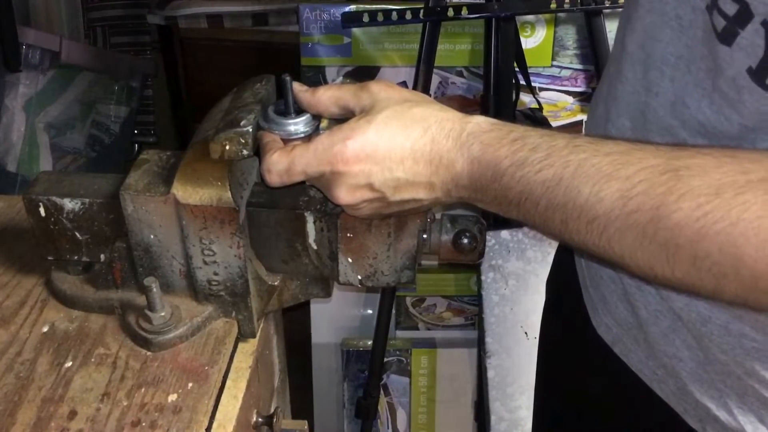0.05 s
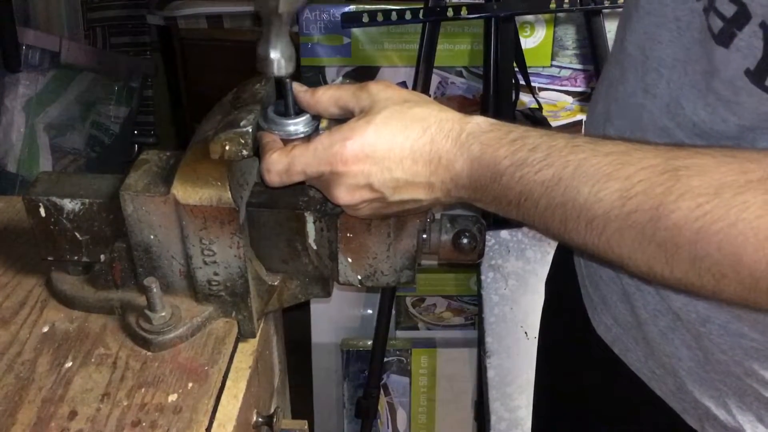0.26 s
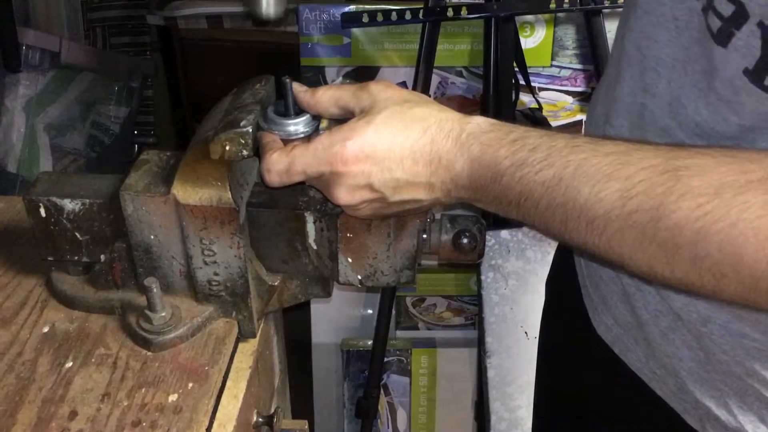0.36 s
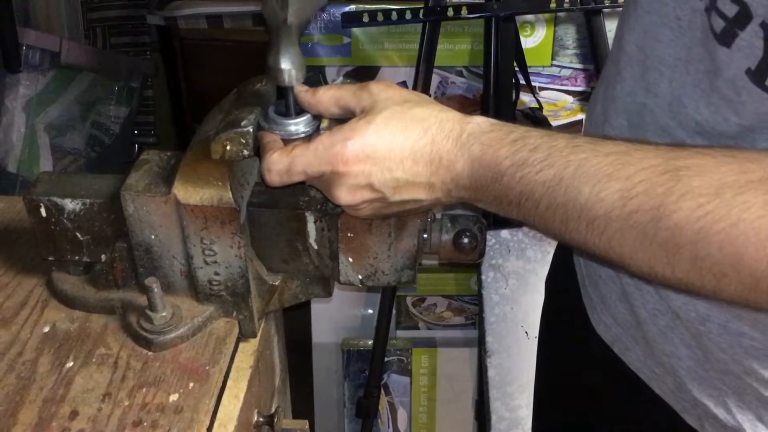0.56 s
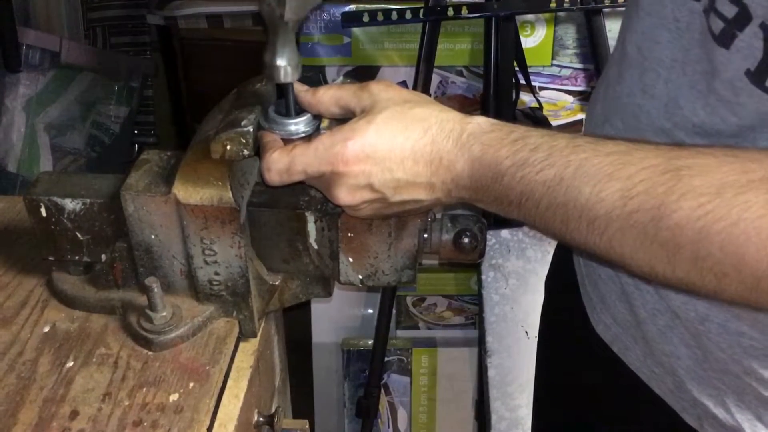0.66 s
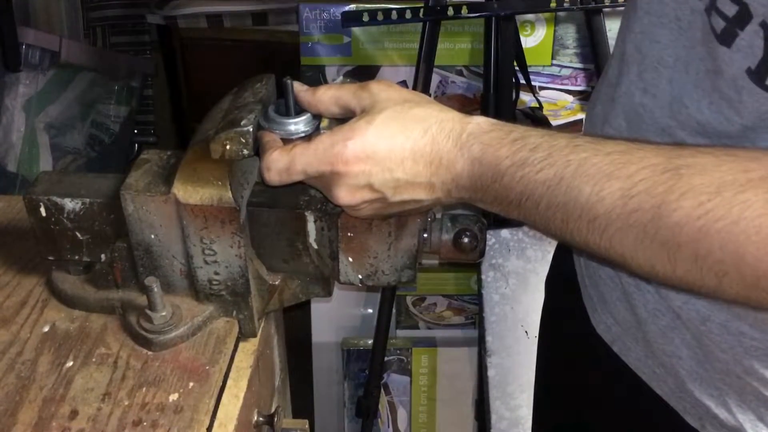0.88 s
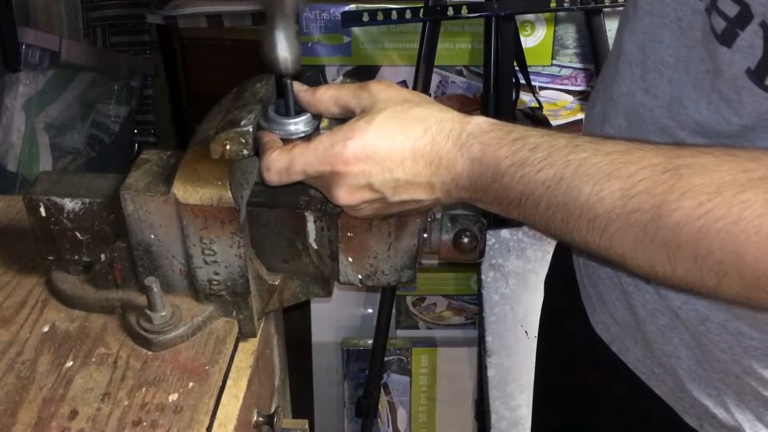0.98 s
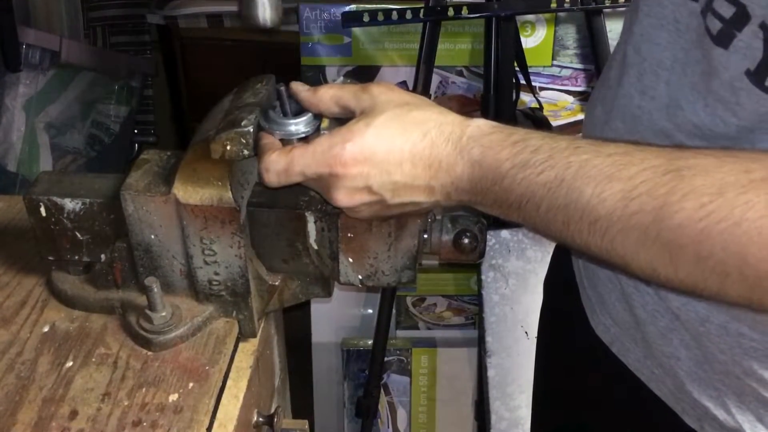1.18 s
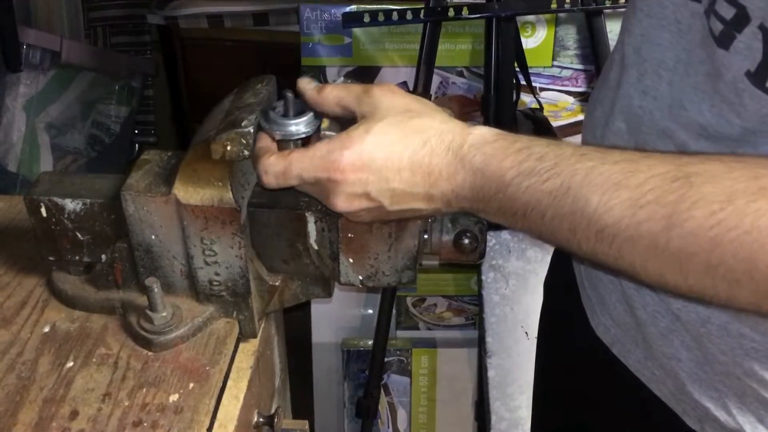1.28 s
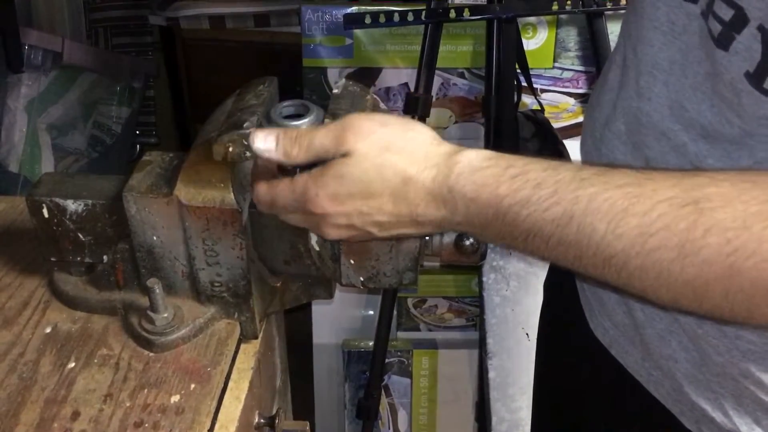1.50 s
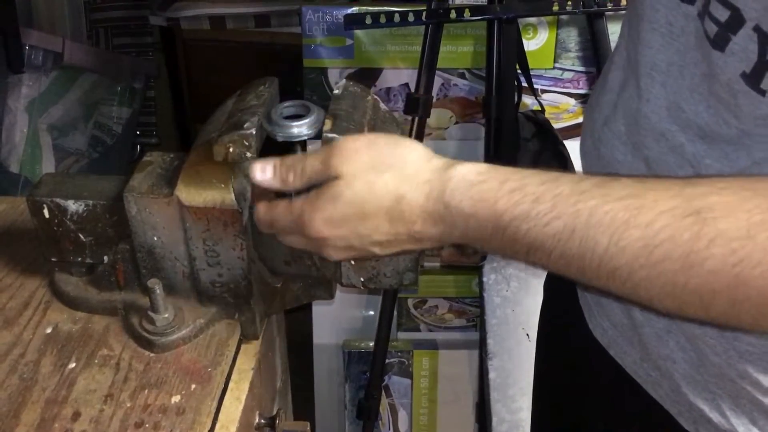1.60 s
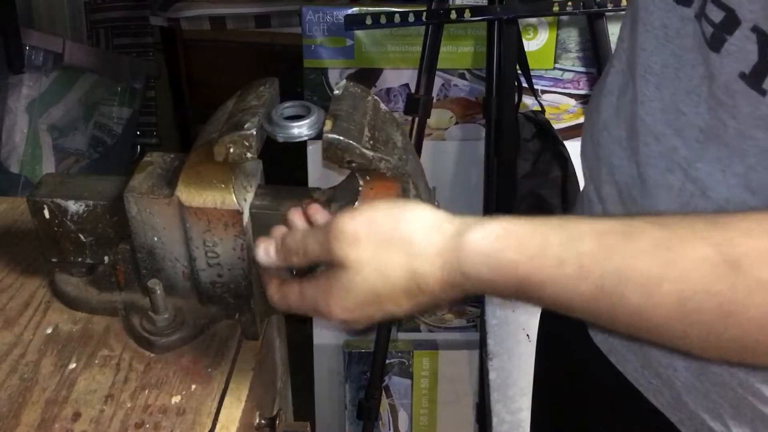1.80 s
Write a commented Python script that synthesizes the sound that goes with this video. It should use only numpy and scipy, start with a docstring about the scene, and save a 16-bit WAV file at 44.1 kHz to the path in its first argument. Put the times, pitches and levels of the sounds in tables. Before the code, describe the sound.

A hammer strikes a steel punch three times at an even pace, each bright blow ringing briefly. The last rattles the punch loose, then the metal clinks and scrapes with a high ring, close by in a small, quiet workshop.

```python
"""Hammer and punch at a bench vice

A hammer taps a steel punch in a fitting that rests on a vice, in a small, quiet workshop.
After the tail of an earlier blow, three even blows ring the steel and shake the bench; the last
frees the punch, which rattles. Then the loosened metal is drawn off: it knocks, clinks, scrapes
and sings on one high note."""
import sys
import numpy as np
from scipy import signal
from scipy.fft import rfft, irfft
from scipy.io import wavfile
from scipy.ndimage import uniform_filter1d

SR = 44100
rng = np.random.default_rng(int(sys.argv[2]) if len(sys.argv) > 2 else 0)


def store_pcm(level_fs):
    """Save levels as 16-bit WAV."""
    pcm = np.round(np.clip(level_fs, -1, 1) * 32767).astype(np.int16)
    wavfile.write(sys.argv[1], SR, np.atleast_2d(pcm).T)


N = 81585
T = np.arange(SR) / SR  # one second, the clock of a single hit
SCENE_T = np.arange(N) / SR


def amp(db):
    """Decibels to gain."""
    return 10 ** (np.asarray(db) / 20)


def unit(x):
    """Scales to rms 1."""
    return x / np.sqrt(np.mean(x ** 2) + 1e-20)


def fade(t60):
    """Exponential decay, 60 dB down after t60 seconds."""
    return np.exp(-np.log(1000) * T / max(t60, 1e-4))


def attack(rise_s):
    """Linear ramp up to full level."""
    return np.minimum(T / rise_s, 1)


def add(mix, s, sound):
    """Mixes a sound in at time s."""
    at = round(s * SR)
    sound = sound[max(-at, 0):]
    part = mix[max(at, 0):][:len(sound)]
    part += sound[:len(part)]


def colour(x, points):
    """Minimum-phase EQ through (frequency [Hz], gain [dB]) points."""
    hz, db = np.transpose(points)
    size = 4096
    bin_hz = abs(np.fft.fftfreq(size, 1 / SR))
    log_gain = np.log(amp(np.interp(np.log(bin_hz + 1), np.log(hz + 1), db)))
    response = np.exp(np.conj(signal.hilbert(log_gain)))
    taps = np.fft.ifft(response).real[:size // 2]
    return signal.fftconvolve(x, taps)[:len(x)]


def noise(points, size=SR):
    """Coloured noise of rms 1."""
    return unit(colour(rng.standard_normal(size + SR), points)[SR:])


def burst(envelope, points, smooth_hz=500):
    """A noise transient, flattened across frequency and then coloured; its rms follows the envelope."""
    spectrum = rfft(envelope * rng.choice([-1, 1], SR))
    power = abs(uniform_filter1d(abs(spectrum) ** 2, smooth_hz))
    flat = irfft(spectrum / np.sqrt(power + 1e-20), SR) * (T < .5)
    eq_gain = np.linalg.norm(colour(signal.unit_impulse(SR), points))
    return colour(flat, points) * np.linalg.norm(envelope) / eq_gain


def drift(hz):
    """Random motion of rms 1, mostly slower than hz."""
    rolloff = np.exp(-(np.fft.rfftfreq(N, 1 / SR) / hz) ** 2)
    return unit(irfft(rfft(rng.standard_normal(N)) * rolloff, N))


def ring(modes):
    """Struck modes, each dying at its own speed."""
    return sum(amp(db) * fade(t60) * np.sin(2 * np.pi * hz * T) for hz, db, t60 in modes)


# early reflections off near surfaces: (delay [s], level [dB])
ECHOES = [(.0023, -2), (.0056, -1.5), (.0089, -6), (0.0106, -8.5), (0.015, -17.5)]
# EQ of those reflections: (frequency [Hz], gain [dB])
ECHO_EQ = [(1000, -7), (4000, 1), (6500, 0), (9000, -2), (15000, -7.5)]


def reflected(x):
    """A short sound followed by its coloured returns from near surfaces."""
    out, bounce = x.copy(), colour(x, ECHO_EQ)
    for delay, db in ECHOES:
        add(out, delay, amp(db) * bounce)
    return out


def echoed(envelope):
    """Envelope of a transient and its early reflections, summed in power."""
    power = envelope ** 2
    for delay, db in ECHOES:
        add(power, delay, (amp(db) * envelope) ** 2)
    return np.sqrt(power)


# reverb time of the workshop: (frequency [Hz], t60 [s])
ROOM_T60 = [(150, 0.97), (1000, 0.39), (3000, 0.34), (5500, 0.36), (9000, 0.32), (15000, .24)]


def room_decay(x, rise_s=.004):
    """Lets a sound build up and die away as the room does, band by band."""
    bin_hz, t, bands = signal.stft(x, SR, nperseg=256)
    hz, t60 = np.transpose(ROOM_T60)
    band_t60 = np.interp(np.log(bin_hz + 1), np.log(hz), t60)
    bands = bands * np.exp(-np.log(1000) * t / band_t60[:, None])
    return signal.istft(bands, SR, nperseg=256)[1][:SR] * (1 - np.exp(-T / rise_s))


def with_reverb(x, send_db):
    """A sound plus the diffuse reverb of the workshop."""
    tail = room_decay(rng.standard_normal(SR))
    return x + amp(send_db) * signal.fftconvolve(x, tail / np.linalg.norm(tail))[:N]


# EQ of the workshop hush: (frequency [Hz], gain [dB])
HUSH_EQ = [(20, -6), (55, 3), (95, -5), (125, -2.5), (190, -8), (245, -2.5), (310, -10.5), (450, -11.5),
           (600, -16.5), (1200, -17.5), (1600, -20), (2200, -22.5), (2800, -21.5), (3700, -25.5),
           (8000, -29.5), (15500, -33.5)]
# partials of the whine: (frequency [Hz], rms level [dB])
WHINE = [(119, -70), (356, -74), (1528, -80), (1706, -81), (1764, -81.5), (2526, -76), (2645, -81.5),
         (2762, -76), (3114, -81)]


def room_tone(hush_db=-58.5):
    """A steady bed of hush with a faint whine, as of a small fan."""
    whine = sum(amp(db) * unit(np.sin(2 * np.pi * (hz * SCENE_T + rng.random()))) for hz, db in WHINE)
    return amp(hush_db) * noise(HUSH_EQ, size=N) + whine


# EQ of a steel-on-steel impact: (frequency [Hz], gain [dB])
CRACK_EQ = [(200, -33), (700, -38.5), (1000, -26), (1300, -11.5), (1700, -25.5), (2400, -23.5), (3300, -17),
            (4500, -5), (5600, -2), (6600, -7), (7300, -7), (8700, -23), (12000, -20), (16000, -29)]


def crack(db=-5, t60=.0081, rise_s=.00025):
    """The bright transient of steel striking steel."""
    return burst(amp(db) * fade(t60) * attack(rise_s), CRACK_EQ)


# hollow knock of the punch at first contact: (frequency [Hz], level [dB], t60 [s])
TOCK_MODES = [(1150, -33.5, 0.04), (1328, -20, 0.024), (1453, -28.5, .035)]
# ring of punch, hammer and vice: (frequency [Hz], level [dB], t60 [s])
STEEL_MODES = [(2735, -28, .06), (3758, -29, .11), (4048, -26, .1), (4565, -20, .12), (4808, -23, .1),
               (5027, -23, .1), (5191, -23, .1), (5302, -23, .06), (5630, -22, .06), (5726, -22, .18),
               (6072, -23, .1), (6280, -28, .09), (6886, -26, .07), (7290, -30, .14), (8220, -43, .25)]
# EQ of the room tail after a hit: (frequency [Hz], gain [dB])
TAIL_EQ = [(200, -30), (700, -23), (1050, -19), (1400, -9.5), (2000, -20.5), (3000, -12.5), (4000, -3),
           (5600, 2.5), (6800, -7), (8100, -11), (8700, -20), (12500, -20.5), (16000, -31.5)]
# EQ of the bench's shudder: (frequency [Hz], gain [dB])
BENCH_EQ = [(20, -16), (60, 3), (130, -6), (260, -2), (330, -8), (600, -20), (1500, -53.5)]
# hammer blows: (time [s], level [dB], ring trim [dB], low-mid EQ [dB], mid EQ [dB],
# presence EQ [dB], top EQ [dB], bench trim [dB])
BLOWS = [(-.2, 2, 0, 10.5, -9, 0, 0, 4), (0.2207, 1.5, -2, 2.5, -2, -0.5, 1.5, 1),
         (0.6427, 2, -1.5, -1, 0, -1, 1.5, 0.5), (1.0761, -2, -1.5, 5, 10, 6, 3.5, -11)]


def hammer(contact_lead_s=.0012, contact_db=-10, clang_db=-22, tail_db=-22.5, shudder_db=-32.5):
    """Each blow makes contact, cracks, clangs, rings the steel, fills the room and shakes the bench."""
    out = np.zeros(N)
    clang = burst(amp(clang_db) * fade(t60=.05), CRACK_EQ)
    walls = noise(TAIL_EQ)  # the part of the tail that all blows share
    steel = ring(STEEL_MODES) * (1 - np.exp(-T / .0026))  # the ring blooms in a few milliseconds
    tock = ring(TOCK_MODES) * attack(contact_lead_s)
    for s, db, ring_db, low_mid_db, mid_db, presence_db, top_db, bench_db in BLOWS:
        hit = reflected(crack()) + clang + amp(ring_db) * steel
        hit += amp(tail_db) * room_decay(unit(walls + noise(TAIL_EQ)))
        eq = [(600, low_mid_db), (1300, 0), (2200, mid_db), (3300, 0), (4200, 0),
              (4900, presence_db), (5800, 0), (12000, top_db)]
        add(out, s, amp(db) * colour(hit, eq))
        contact = amp(contact_db) * crack() + amp(ring_db) * tock
        add(out, s - contact_lead_s, amp(db) * contact)
        shudder = noise(BENCH_EQ) * attack(rise_s=.055) * fade(t60=.32)
        add(out, s, amp(shudder_db + bench_db) * shudder)
    return out


# bounces of the freed punch: (time [s], level [dB])
RATTLES = [(1.1466, -9.5), (1.1482, -13.5), (1.1656, -18.5)]
# EQ of a bounce: (frequency [Hz], gain [dB])
RATTLE_EQ = [(1000, -2.5), (2500, 0.5), (4500, -0.5), (6000, -4.5), (9000, -5.5), (15000, -17)]


def punch_rattle(tail_db=-24):
    """The freed punch rattles: quick, lighter cracks, each with a room tail."""
    out = np.zeros(N)
    for s, db in RATTLES:
        bounce = reflected(crack()) + amp(tail_db) * room_decay(noise(TAIL_EQ))
        add(out, s, amp(db) * colour(bounce, RATTLE_EQ))
    return out


# dull knocks on the bench: (time [s], pitch [Hz], level [dB], t60 [s])
KNOCKS = [(1.392, 158, -23, 0.048), (1.393, 240, -33, .035), (1.2, 67, -39, .13), (1.79, 43, -42.5, .2)]


def knocks():
    """Short low thuds as the hand moves the fitting about on the vice."""
    out = np.zeros(N)
    for s, hz, db, t60 in KNOCKS:
        soft_onset = 1 - np.exp(-2 * T * hz)
        add(out, s, ring([(hz, db, t60)]) * soft_onset)
    return out


# ring-out of the loose metal: (frequency [Hz], level [dB], t60 [s])
LOOSE_MODES = [(2063, -34, 0.36), (3760, -25.5, 0.37), (5160, -14, 0.058), (4730, -19, 0.23),
               (12550, -35.5, 0.14)]
# EQ of its ticks and scrapes: (frequency [Hz], gain [dB])
RASP_EQ = [(300, -29), (1600, -24), (2000, -12), (2900, -15.5), (3800, -7), (4400, -12.5), (5100, 0),
           (5900, -7), (7500, -27), (11500, -43), (14300, -36), (16000, -47.5)]
# it touches the fitting: (time [s], tick trim [dB], ping level [dB], ping pitch [Hz], treble [dB])
CLINKS = [(1.3798, -6.5, -38, 5250, -1), (1.3836, -3, -18, 5184, 1.5), (1.3892, -21, -17.5, 5064, 4.5),
          (1.4352, -30, -20, 5043, -9.5), (1.451, -15.5, -16, 5005, -6),
          (1.4708, -18.5, -15.5, 5060, -15.5), (1.4942, -11, -40.5, 5060, 7.5),
          (1.5049, -12, -23.5, 5070, 4.5), (1.516, -6.5, -28.5, 5070, 2.5), (1.5886, -7.5, -24.5, 5080, 9)]


def clinks(tick_db=-22):
    """Light contacts tick and ping the loose metal, which the hand damps quickly."""
    out = np.zeros(N)
    onset = attack(rise_s=.00027)
    tick_envelope = amp(tick_db) * echoed(fade(t60=.0091))
    ping_envelope = echoed(onset * fade(t60=.015))
    ring_out = onset * ring(LOOSE_MODES)
    for s, trim_db, ping_db, hz, treble_db in CLINKS:
        tick = amp(trim_db) * burst(tick_envelope, RASP_EQ)
        ping = amp(ping_db) * (ping_envelope * np.sin(2 * np.pi * hz * T) + ring_out)
        shelf = [(5600, 0), (7500, treble_db)]  # sits above the main ring
        add(out, s, colour(tick + ping, shelf))
    return with_reverb(out, send_db=-15.5)


# modes that friction keeps singing: (frequency [Hz], relative level [dB], rms wander [Hz])
SINGING_MODES = [(5072, 0, 20), (3745, -26, 60), (12560, -38, 30)]
# automation of the slide: (time [s], rasp level [dB], singing level [dB], rasp treble [dB])
SLIDE = [(1.381, -44, -67.5, -6), (1.39, -43, -47.5, -1), (1.405, -35, -38.5, -21),
         (1.43, -40, -34.5, -11.5), (1.449, -47, -33, -9), (1.48, -39.5, -34.5, -0.5),
         (1.492, -43, -51, -1), (1.514, -40, -40, 3), (1.53, -34, -26, 1), (1.544, -35, -21, 5.5),
         (1.557, -42, -35, 4), (1.566, -45, -50, -8), (1.584, -49.5, -49, -11), (1.599, -41, -31.5, 6),
         (1.612, -43, -43.5, -27), (1.646, -46.5, -43, -3), (1.665, -78, -58.5, -10), (1.69, -62, -69, -9)]


def slide(slips_per_s=1100, spread_db=4, shelf_hz=6500):
    """Tiny slips rasp as steel slides on steel, and keep a few modes singing."""
    s, rasp_db, singing_db, treble_db = np.transpose(SLIDE)
    slipping = rng.random(N) < slips_per_s / SR
    slips = slipping * amp(spread_db * rng.standard_normal(N)) * rng.choice([-1, 1], N)
    rasp = unit(colour(slips, RASP_EQ)) * np.interp(SCENE_T, s, amp(rasp_db), 0, 0)
    treble = signal.sosfiltfilt(signal.butter(6, shelf_hz, "high", fs=SR, output="sos"), rasp)
    rasp += treble * (amp(np.interp(SCENE_T, s, treble_db)) - 1)
    note = np.zeros(N)
    for hz, db, wander_hz in SINGING_MODES:
        pitch = hz + wander_hz * drift(hz=148)
        note += amp(db) * np.sin(2 * np.pi * np.cumsum(pitch) / SR)
    flutter = 1 + .2 * drift(hz=250)
    singing = unit(note * flutter) * np.interp(SCENE_T, s, amp(singing_db), 0, 0)
    return with_reverb(rasp + singing, send_db=-21)


def squeak(start_s=1.493, length_s=.07, hz=14400, width_hz=220, db=-59):
    """A faint, very high stick-slip squeak just before the metal comes clear."""
    progress = (SCENE_T - start_s) / length_s
    arch = np.sqrt(np.maximum(1 - (2 * progress - 1) ** 2, 0))
    narrow_band = unit(drift(width_hz) * np.sin(2 * np.pi * hz * SCENE_T))
    return amp(db) * arch * narrow_band


def scene():
    """All sources in one mono mix."""
    return (hammer() + punch_rattle() + clinks() + slide() + squeak() + knocks() + room_tone())[None]


def record(dry):
    """Soft clipping on the peaks, then a steep low-pass."""
    ceiling, cutoff_hz = amp(-2.5), 15900
    soft = dry / (1 + (dry / ceiling) ** 4) ** (1 / 4)
    lowpass = signal.firwin(255, cutoff_hz, window=("kaiser", 9), fs=SR)
    return signal.oaconvolve(soft, lowpass[None], "same")


dry = scene()
out = record(dry)
store_pcm(out)
```